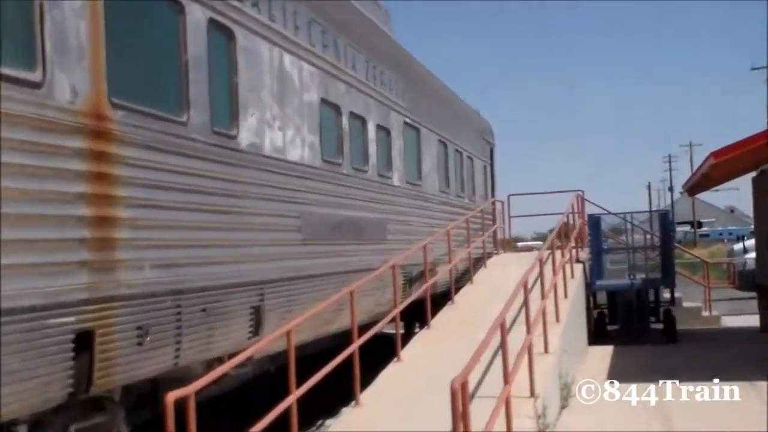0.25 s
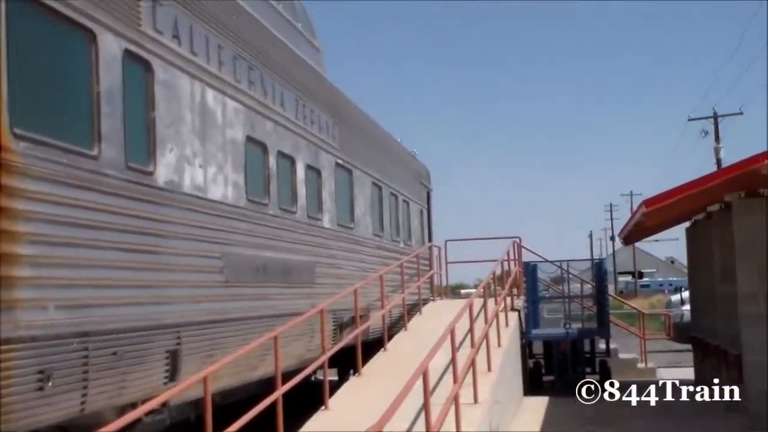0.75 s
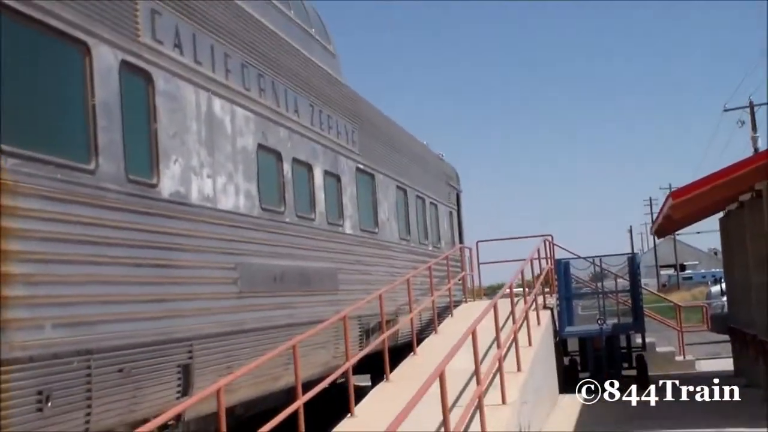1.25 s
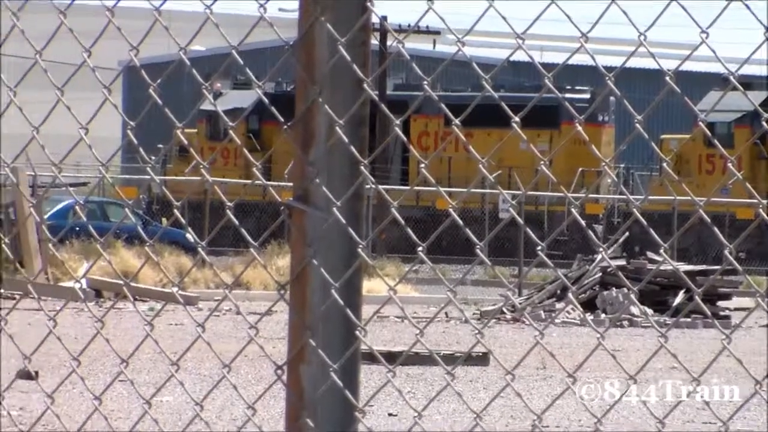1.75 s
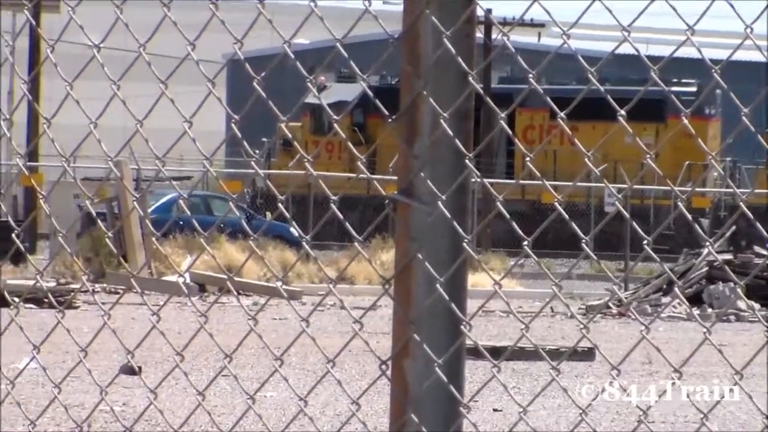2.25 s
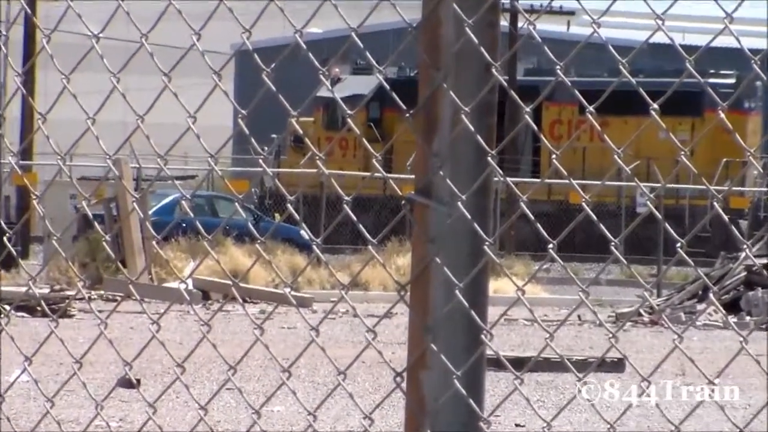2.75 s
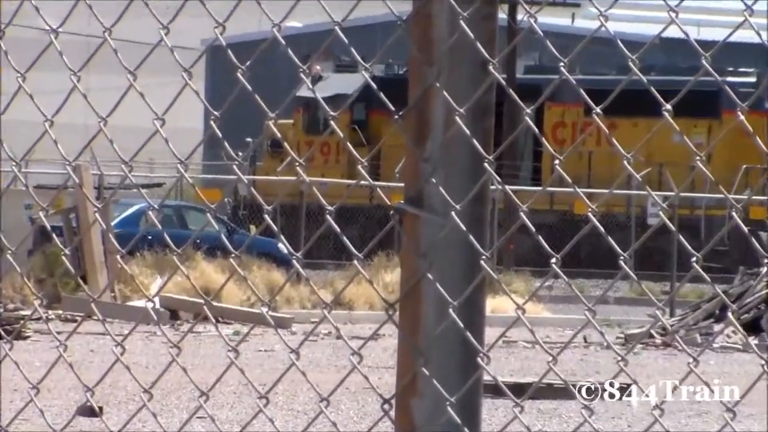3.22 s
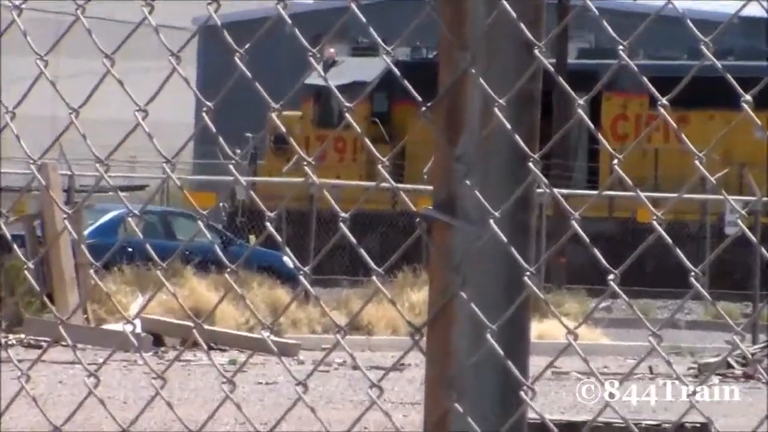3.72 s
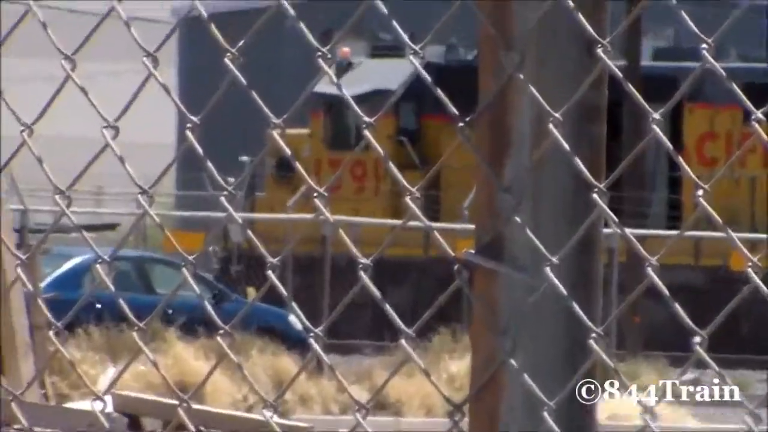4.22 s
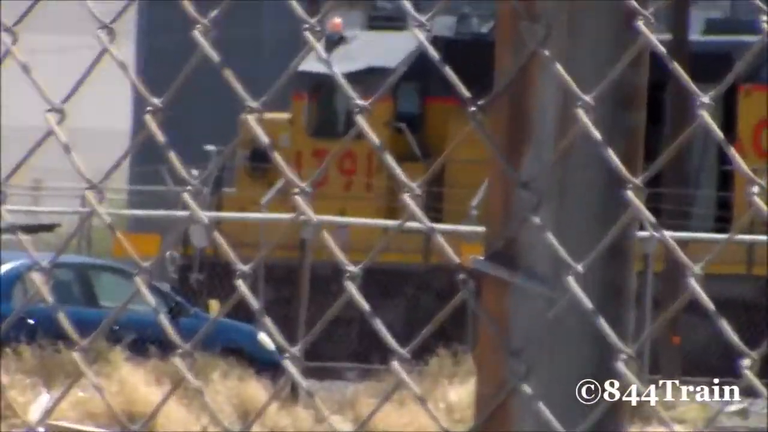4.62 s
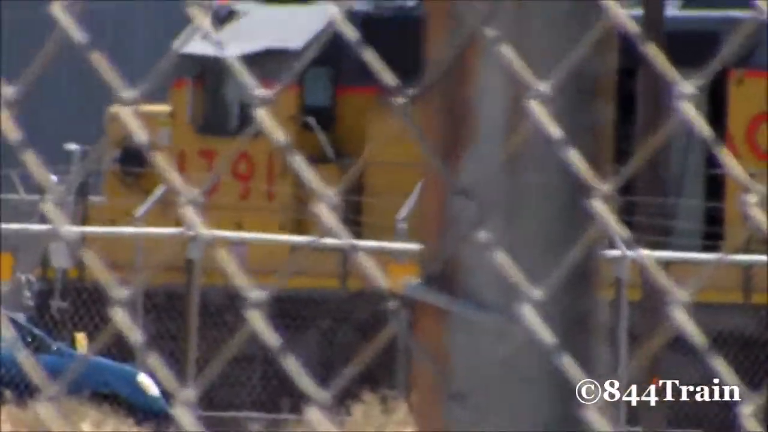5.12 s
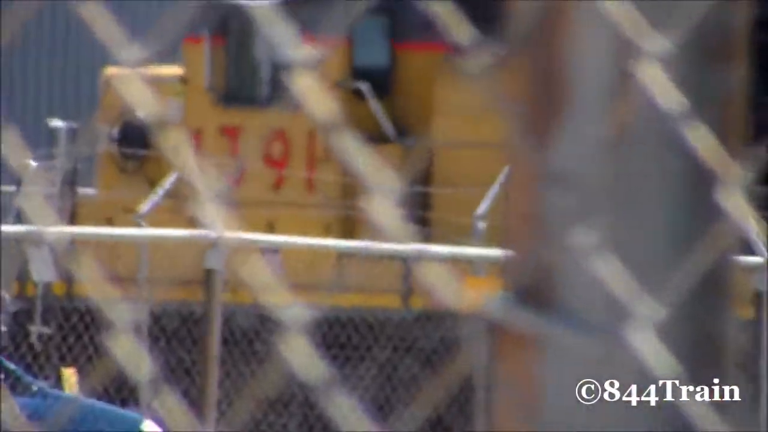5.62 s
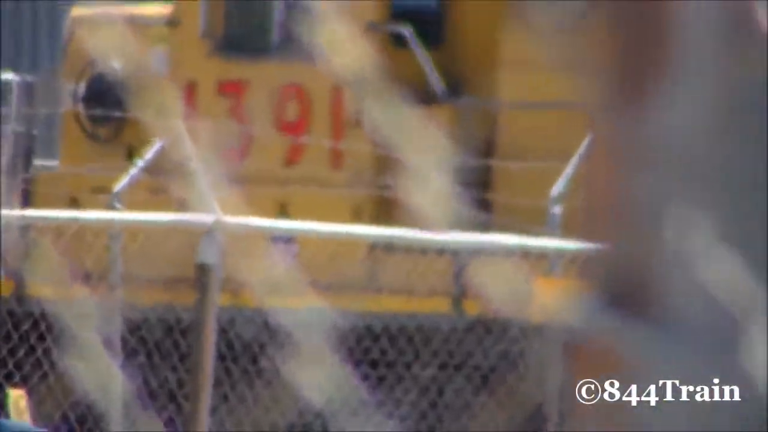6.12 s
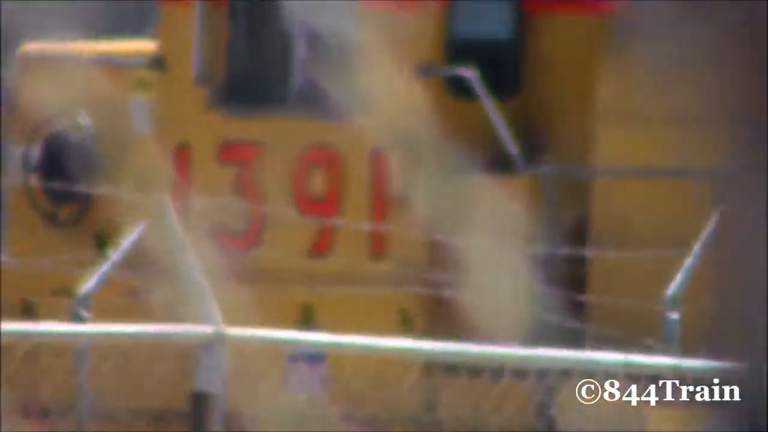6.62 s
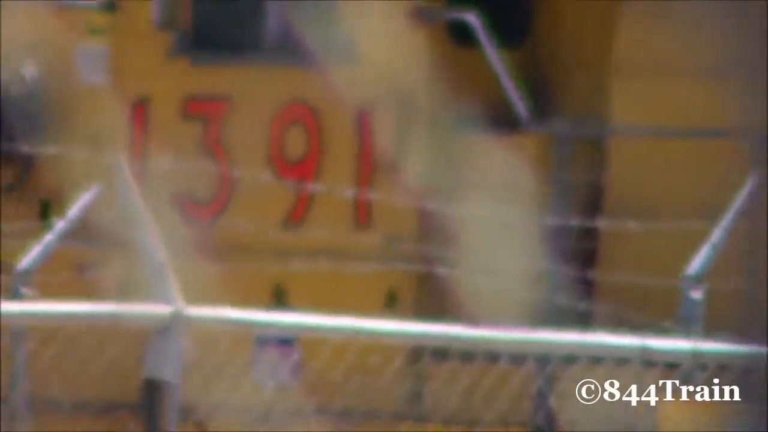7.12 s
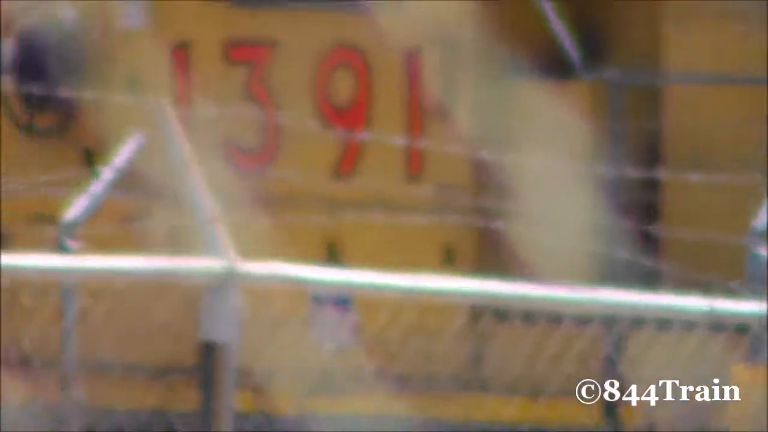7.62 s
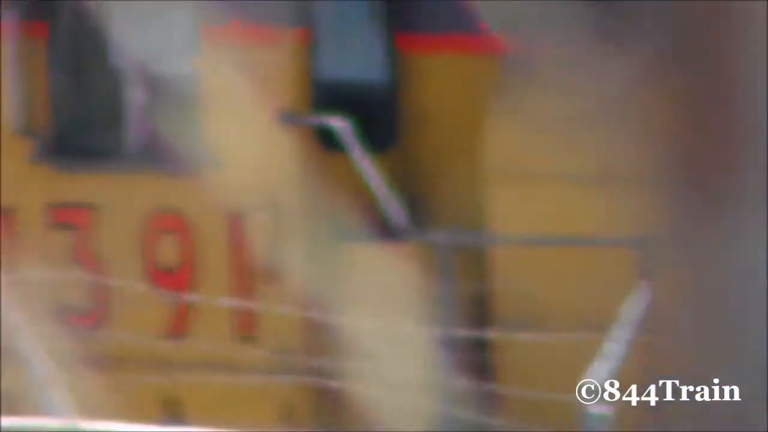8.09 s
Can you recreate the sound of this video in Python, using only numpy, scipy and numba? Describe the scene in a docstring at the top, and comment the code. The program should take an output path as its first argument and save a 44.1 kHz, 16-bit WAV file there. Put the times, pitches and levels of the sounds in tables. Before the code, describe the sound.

From 0 to 1.35 seconds, wind buffets a handheld stereo microphone: soft, flickering bass thumps leaning left, strongest around 0.4 to 0.6 seconds, over a dull, far-off yard roar. At 0.22 seconds a loud plastic button snap cracks close by, and the background drops in level, recovering around 0.7 seconds. Tiny finger ticks follow at about 0.5, 0.7 and 1.0 seconds. Silence lasts about a tenth of a second. At 1.46 seconds three idling diesel locomotives start abruptly and continue to about 8.4 seconds: low hums beating together, a quick rising throb about five times a second, and a broad, slightly chugging roar. A mid-high gear whine grows by 3.4 seconds; a thin, higher whine swells near 1.5, 2.6, 5.4, 6.5 and, longer, 7.4 seconds. A small cluster of finger ticks comes at 4.55 seconds. Faint hiss underlies both scenes.

```python
"""A rail yard, heard in two scenes through a hand-held stereo camera and parted by a short silence.
First: wind buffets (flickering bass noise) hit the microphones over far-off yard roar (steady noise);
a button snaps (struck modes of the shell) and the gain control ducks.
Then: three diesel locomotives idle beyond a fence. Multiples of their shaft speeds throb and beat,
gear tones whine over a broad noise roar. Fingers tick on the camera in both scenes."""
import sys
import numpy as np
from scipy import signal
from scipy.fft import rfft, irfft, next_fast_len
from scipy.io import wavfile
from scipy.ndimage import uniform_filter1d
from numba import njit

SR = 44100
rng = np.random.default_rng(int(sys.argv[2]) if len(sys.argv) > 2 else 0)


def wav_record(signal):
    """Record a signal, one row per channel, as 16-bit PCM in the file named by sys.argv[1]."""
    frames = np.transpose(np.atleast_2d(signal))
    bounded = np.clip(frames, -1, 1)
    # unit amplitude maps onto the largest positive 16-bit level
    quanta = np.round(bounded * 32767).astype(np.int16)
    wavfile.write(sys.argv[1], SR, quanta)


def boost(x):
    """Linear amplitude factor 10**(x/20) for a level x in decibels (scalar or array-like)."""
    u = np.asarray(x, float) / 20
    return 10 ** u


N = 368235
T = np.arange(N) / SR  # time in s
CUT_S, RESUME_S = 1.3547, 1.4640  # the first place ends, the second begins
FIRST_SIZE = int(CUT_S * SR) + 1  # samples
FIRINGS = 8  # near engine, per turn of its shaft


def curve(table):
    """Columns of a table of (time_s, value, ..), interpolated at every sample."""
    time_s, *columns = np.transpose(table)
    return [np.interp(T, time_s, column) for column in columns]


def walk(rate, size=N):
    """Random levels held 1 / rate s and slewed twice; spread near 1."""
    held = int(SR / rate)
    steps = np.repeat(rng.standard_normal(size // held + 1), held)
    return 1.29 * uniform_filter1d(uniform_filter1d(steps, held), held)[:size]


def noise(spectrum, flicker_db, rate, size=N):
    """Noise of rms 1 with this colour; each octave flickers on its own."""
    top_hz = 14250
    pitch_hz, density_db = np.transpose(spectrum)
    fast = next_fast_len(size)
    octave = np.log2(np.maximum(np.arange(fast // 2 + 1) * SR / fast, 1))
    colour = boost(np.interp(octave, np.log2(pitch_hz), density_db)) * (octave < np.log2(top_hz))
    tone = rfft(rng.standard_normal(fast)) * colour
    out = 0
    for k in range(4, 15):
        band = irfft(tone * np.clip(1 - abs(octave - k), 0, 1), fast)[:size]
        out = out + band * boost(flicker_db * walk(rate, size))
    return np.pad(out / out.std(), (0, N - size))


def engine(orders, shaft_hz, start_s, sweep=0., centre=0.):
    """Multiples of a slightly drifting shaft; sweep sends higher ones out later in the turn: a rising throb."""
    step = 8  # these low tones are worked out at every eighth sample
    turns = shaft_hz * (T - start_s) + 0.00079 * walk(1)
    out = 0
    for (k, db), wobble in zip(orders, rng.standard_normal((len(orders), 24))):
        # air along the path makes every tone waver in level
        waver_db = .9 * np.interp(T[::step], np.linspace(0, N / SR, 24), wobble)
        phase = k * turns[::step] - sweep * (k - centre) ** 2
        out = out + boost(db + waver_db) * np.cos(2 * np.pi * phase)
    return np.sqrt(2) * signal.resample_poly(out, step, 1)[:N], turns


# where the near engine's block resonates: centre_hz, width_hz (6 dB down at this offset), level_db (rms)
BLOCK = [(170, 58, -59), (347.5, 18, -57), (387, 28, -54), (455, 17, -53), (520, 30, -56), (677, 21, -55)]
# its firing tone and the exhaust throb above it: multiple of shaft speed, level_db (rms)
EXHAUST = [(8, -38), (9, -50), (12, -46), (14, -42), (15, -36), (16, -41), (17, -38), (18, -46)]


def near_orders(shaft_hz):
    """(multiple, level_db) of the near engine: block resonances, then gear mesh and exhaust over them."""
    teeth = 79
    mesh_levels_db = [-40, -55, -47]  # mesh tone and two overtones, rms
    turn_bands_db = [-9, 3, -12]  # tone one turn below each, relative to it
    firing_band_db = -5  # tone one firing below the mesh tone, relative to it
    k = np.arange(6, 141)
    resonances = [top_db - 6 * ((k * shaft_hz - hz) / width) ** 2 for hz, width, top_db in BLOCK]
    scatter_db = 3 * rng.standard_normal(len(k))
    orders = dict(zip(k, np.max(resonances, axis=0) + scatter_db))
    for n, (mesh_db, band_db) in enumerate(zip(mesh_levels_db, turn_bands_db), 1):
        orders.update({n * teeth: mesh_db, n * teeth - 1: mesh_db + band_db})
    orders[teeth - FIRINGS] = mesh_levels_db[0] + firing_band_db
    return list({**orders, **dict(EXHAUST)}.items())


def near_engine():
    """Sound and turns of the near engine, whose multiples are spread into a rising throb."""
    shaft_hz = 5.2947
    return engine(near_orders(shaft_hz), shaft_hz, start_s=4.533, sweep=.0725, centre=15.3)


# tones of the second engine: multiple of shaft speed, level_db (rms)
SECOND_TONES = [(4.0, -49), (6.0, -40), (12.0, -52), (13.0, -55), (14.0, -54), (15.0, -48), (18.0, -45),
                (24.0, -48), (36.0, -42.5), (48.0, -43.5), (50.0, -56), (64.5, -53)]


def second_engine():
    """A faster shaft; its tones beat against the near engine's."""
    return engine(SECOND_TONES, shaft_hz=6.3717, start_s=4.5)[0]


# tones of the third engine, low firing hum and one gear-mesh tone: multiple of shaft speed, level_db (rms)
THIRD_TONES = [(8, -33), (32, -47), (158, -52)]


def third_engine():
    """A shaft nearly as fast as the near one, so the two beat slowly."""
    return engine(THIRD_TONES, shaft_hz=5.2505, start_s=4.4824)[0]


def whine(hz, db, turns, throb, sway_hz, lag, blur_hz, flutter, waver_db):
    """A gear tone that swells and sways once a turn and flutters with the eight firings; lag in turns."""
    beat = np.cos(2 * np.pi * (turns - lag))
    firing = np.cos(2 * np.pi * (FIRINGS * turns + .15 * walk(10)))
    hz = hz + sway_hz * beat + blur_hz * walk(25)
    size = boost(db + waver_db * walk(30)) * (1 + throb * beat) * (1 + flutter * firing)
    return np.sqrt(2) * size * np.sin(2 * np.pi * np.cumsum(hz) / SR)


# three gear tones, before sway and waver: time_s, pitch_hz, level_db (rms)
GEAR_WHINE = [(1.47, 1494, -60), (2.2, 1494, -54), (2.8, 1495, -51), (3.4, 1494.3, -46), (5.8, 1494, -46),
              (6.4, 1494.3, -48.5), (8.35, 1494.5, -47.5)]
FADING_WHINE = [(1.47, 1509, -48), (2.7, 1510, -49), (3.1, 1513, -55), (8.35, 1513, -56)]
THIN_WHINE = [(1.47, 2900, -60), (3.5, 2909, -60), (8.35, 2908, -62)]


def gear_whines(turns):
    """Three gear tones: one growing and throbbing, one fading, one thin and high."""
    growing = whine(*curve(GEAR_WHINE), turns, throb=0.28, sway_hz=0.4, lag=0.59,
                    blur_hz=0.51, flutter=0.16, waver_db=3.3)
    fading = whine(*curve(FADING_WHINE), turns, throb=0.019, sway_hz=.1, lag=.1,
                   blur_hz=2.5, flutter=.1, waver_db=2.3)
    thin = whine(*curve(THIN_WHINE), turns, throb=.05, sway_hz=.1, lag=.1,
                 blur_hz=4.5, flutter=.1, waver_db=2.5)
    return growing + fading + thin


# swells of the high whine: full_s (start of the held level), held_s, level_db (rms)
HIGH_SWELLS = [(1.5, .28, -54), (2.6, .45, -48), (5.38, .33, -54.5), (6.45, .35, -57.5), (7.35, 1.1, -47.5)]


def swells_db():
    """Level of the high whine: each swell rises out of a faint level, holds and falls away."""
    faint_db, rise_db_s, fall_db_s = -61.5, 55, 30
    out = np.full(N, faint_db)
    for full_s, held_s, db in HIGH_SWELLS:
        rise_db = rise_db_s * np.maximum(full_s - T, 0)
        fall_db = fall_db_s * np.maximum(T - full_s - held_s, 0)
        out = np.maximum(out, db - rise_db - fall_db)
    return out


# the high whine climbs a little, then settles: time_s, pitch_hz
HIGH_PITCH = [(1.47, 4431), (2.4, 4434), (3.2, 4448), (8.35, 4445)]


def high_whine(turns):
    """A gear tone that sways widely in pitch with the shaft and swells now and then."""
    return whine(*curve(HIGH_PITCH), swells_db(), turns, throb=.1, sway_hz=6, lag=.02,
                 blur_hz=2.5, flutter=.33, waver_db=1.2)


# broad roar of exhaust, fans and valve gear, mid and side: pitch_hz, density_db (per Hz, relative)
ROAR = [(16, -20), (26, -11), (55, 1), (92, -1.5), (120, 1.5), (400, -0.5), (760, -7.5), (1260, -9.5),
        (1550, -16), (1850, -18.5), (2700, -21), (3500, -26.5), (6000, -33.5), (14000, -44)]
ROAR_SIDE = [(15, -28), (25, -3), (87, -8), (414, -16), (498, -18.5), (1470, -16.5), (2030, -21),
             (7610, -27), (14000, -33.5)]


def roar(turns):
    """Mid and side of the roar: coloured noise, faintly pressed by eight exhaust puffs a turn."""
    puffs = 1 + .03 * np.cos(2 * np.pi * FIRINGS * turns)
    chug_db = 0.63 * walk(22)  # uneven firings make the whole roar chug
    mid = boost(-28 + chug_db) * puffs * noise(ROAR, 0.48, 12)
    side = boost(-46) * noise(ROAR_SIDE, 0.7, 8)
    return mid, side


def locomotives():
    """Three engines, their whines and roar; the bass leans left, the high whine right."""
    near, turns = near_engine()
    hum = near + second_engine() + third_engine()
    high = high_whine(turns)
    roar_mid, roar_side = roar(turns)
    mid = hum + gear_whines(turns) + high + roar_mid
    bass = signal.lfilter(*signal.butter(1, 160, fs=SR), mid)
    side = roar_side + 0.097 * bass - 0.071 * high
    return np.array([mid + side, mid - side])


def strike(out, start_s, level_db, pitch_hz, t60_s):
    """Adds one struck mode: a sine that loses 60 dB in t60_s."""
    span = slice(int(start_s * SR) + 1, int((start_s + 2 * t60_s) * SR))
    age_s = T[span] - start_s
    out[span] += boost(level_db - 60 * age_s / t60_s) * np.sin(2 * np.pi * pitch_hz * age_s)


# blows of the camera's button: start_s, level_db (added to each mode's)
SNAPS = [(.2216, -23), (.2227, -21), (.2239, 0), (.2248, -8), (.2284, -14), (.2298, -19)]
# plastic modes the button rings: pitch_hz, level_db, t60_s, side over mid (ratio)
SHELL = [(1300, -19, .008, -.3), (2800, -5, .014, -.2), (3500, -1, .005, -.2), (4500, -4, .005, -.1),
         (5900, -10, .004, -.1), (7600, -8, .005, -.2), (9500, -15, .007, 3), (12600, -13, .003, .8)]


def button():
    """The button snaps through the shell into both microphones, ringing its modes."""
    # modes start with mixed signs, and each blow weights them anew
    scatter_db = 2 * rng.standard_normal((len(SNAPS), len(SHELL)))
    out = 0
    for k, (pitch_hz, mode_db, t60_s, side) in enumerate(SHELL):
        mode = np.zeros(N)
        for (start_s, level_db), own_db in zip(SNAPS, scatter_db[:, k]):
            strike(mode, start_s, level_db + mode_db + own_db, pitch_hz, t60_s)
        out = out + (-1) ** k * mode * np.array([[1 + side], [1 - side]])
    return out


# small ticks of fingers on the body: start_s, level_db (added to each mode's), pitch_hz
TICKS = [(.4883, -38, 7000), (.6953, -45, 6000), (.9830, -32, 7000), (1.0365, -42, 9000),
         (4.5537, -28, 8400), (4.5590, -34, 6500), (4.5677, -29, 8800), (4.5750, -36, 6500)]
# what a tick rings with: ratio to its pitch, level_db, t60_s
TICK_MODES = [(.7, -7, .004), (1, 0, .015), (1.3, -7, .003), (1.55, -4, .004)]


def fingers():
    """Each tick strikes four short modes; it is weaker and two samples later on the right."""
    ticks = np.zeros(N)
    for start_s, level_db, pitch_hz in TICKS:
        for ratio, mode_db, t60_s in TICK_MODES:
            strike(ticks, start_s, level_db + mode_db, pitch_hz * ratio, t60_s)
    return np.array([boost(.8) * ticks, boost(-.8) * np.roll(ticks, 2)])


# colour of wind on the microphones: pitch_hz, density_db (per Hz, relative)
WIND = [(15, -14), (30, -6), (74, 1.5), (180, -4), (270, -14), (400, -25.5), (800, -64.5)]
# wind buffets, each added to the breeze: peak_s, level_db (rms at its height)
BUFFETS = [(0.028, -17), (.13, -19.5), (.2, -21), (.27, -26), (.37, -17), (.47, -14.5), (.59, -16.5),
           (.69, -20), (.82, -27.5), (.92, -30.5), (1.02, -22), (1.12, -28), (1.18, -28), (1.29, -23.5)]
# how unlike the wind is at the two microphones, before it leans left: time_s, side minus mid (dB)
APART = [(.05, -21), (.16, -9.5), (.62, -5), (.96, -7), (1.1, -21)]


def wind():
    """Mid and side of the wind: bass noise under a steady breeze plus bell-shaped buffets."""
    breeze_db, spread_s = -32, 0.028
    gusts = boost(breeze_db)
    for peak_s, level_db in BUFFETS:
        gusts = gusts + boost(level_db) * np.exp(-.5 * ((T - peak_s) / spread_s) ** 2)
    mid = gusts * noise(WIND, 2.0, 16, size=FIRST_SIZE)
    side = gusts * boost(*curve(APART)) * noise(WIND, 4.0, 16, size=FIRST_SIZE)
    return mid, side


# the far yard, mid and side: pitch_hz, density_db (per Hz, relative)
YARD = [(150, 2), (350, 2.5), (900, -4.5), (1500, -11.5), (3000, -22.5), (6000, -35.5), (14000, -68)]
YARD_SIDE = [(150, -4), (500, -12), (1500, -2), (2200, -4.5), (3000, -5), (5700, -13), (14000, -25.5)]


def far_yard():
    """Mid and side of the far-off roar: noise whose treble falls away."""
    mid = boost(-34.5) * noise(YARD, 1.1, 9.9, size=FIRST_SIZE)
    side = boost(-56) * noise(YARD_SIDE, .8, 9, size=FIRST_SIZE)
    return mid, side


def platform():
    """Buffets of wind on both microphones over the far yard."""
    wind_mid, wind_side = wind()
    yard_mid, yard_side = far_yard()
    mid = wind_mid + yard_mid
    side = wind_side + yard_side + .2 * mid  # the left microphone faces the wind
    return np.array([mid + side, mid - side])


# camera electronics: pitch_hz, density_db (per Hz, relative)
HISS = [(300, 0), (3000, -9), (8000, -15.5), (14000, -15)]


def electronics_hiss():
    """Faint noise, independent in the two channels."""
    return boost(-64) * np.array([noise(HISS, .4, 8), noise(HISS, .4, 9.3)])


@njit
def duck(x, top, start, attack, hold, release):
    """Gain that steers peaks to top: falls fast, holds, then climbs back at a steady dB rate."""
    gain, peak, wait, g = np.empty(len(x)), top / start, hold, start
    for i in range(len(x)):
        wait -= 1
        if x[i] > peak:
            peak, wait = x[i], hold
        elif wait < 0:
            peak = max(peak * release, top)
        g += (top / peak - g) * attack
        gain[i] = g
    return gain


def gain_control(dry):
    """One gain for both channels, driven by peaks above 1 kHz so that it ignores wind rumble."""
    top, start_db = .25, -3  # peak it allows, gain it still holds at the start
    attack_s, hold_s, recover_db_s = .0005, .445, 160
    highpass = signal.butter(2, 1000, "high", fs=SR, output="sos")
    heard = abs(signal.sosfilt(highpass, dry)).max(axis=0)
    return duck(heard, top, boost(start_db), 1 / (attack_s * SR), hold_s * SR, boost(-recover_db_s / SR))


def scene():
    """First place, then the second, with the button and fingers on the camera over them."""
    return platform() * (T < CUT_S) + locomotives() * (T > RESUME_S) + button() + fingers()


def low_pass(x):
    """Removes everything above the highest recorded frequency."""
    return signal.sosfilt(signal.butter(12, 15010, fs=SR, output="sos"), x)


def record(dry):
    """The camera: gain control, the hiss behind it, and silence between the two places."""
    running = (T < CUT_S) | (T > RESUME_S)
    mix = (dry * gain_control(dry) + electronics_hiss()) * running
    return low_pass(mix)


dry = scene()
out = record(dry)
wav_record(out)
```